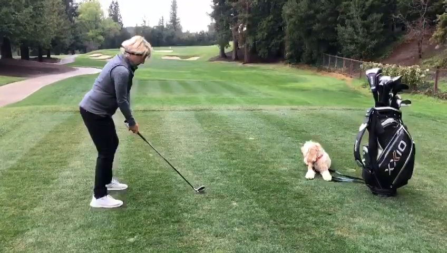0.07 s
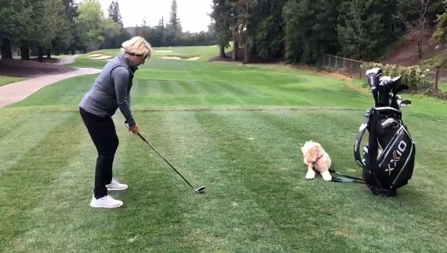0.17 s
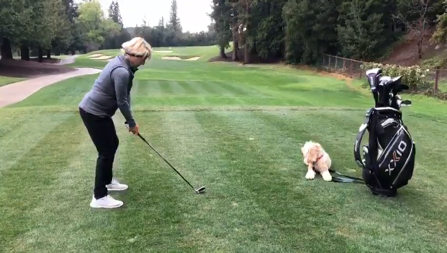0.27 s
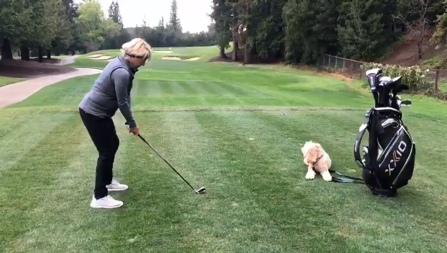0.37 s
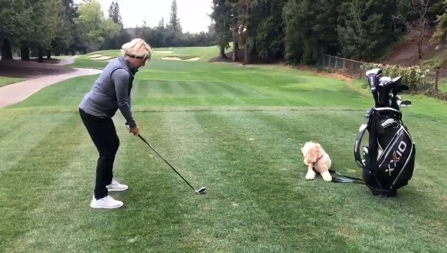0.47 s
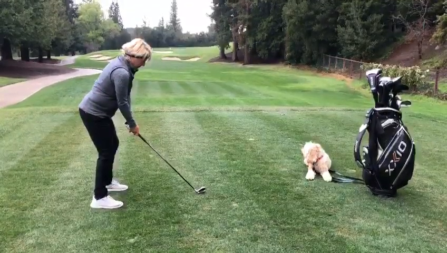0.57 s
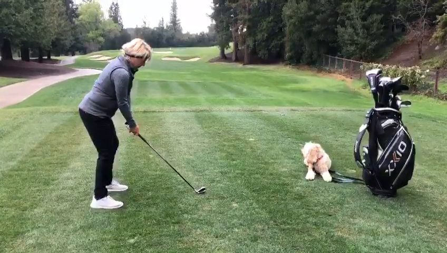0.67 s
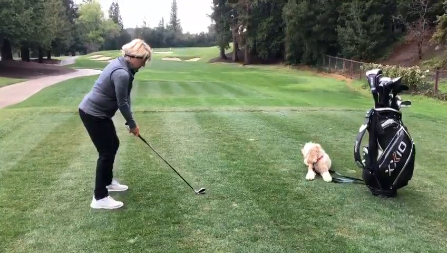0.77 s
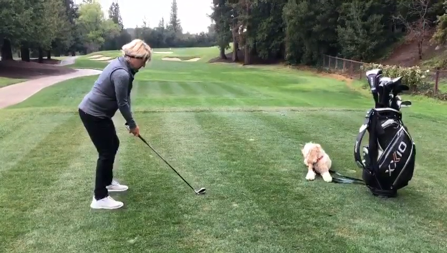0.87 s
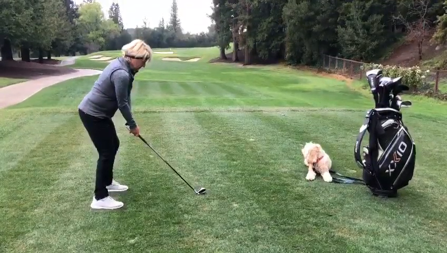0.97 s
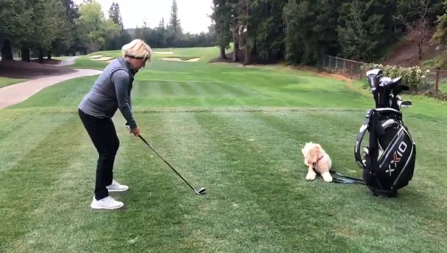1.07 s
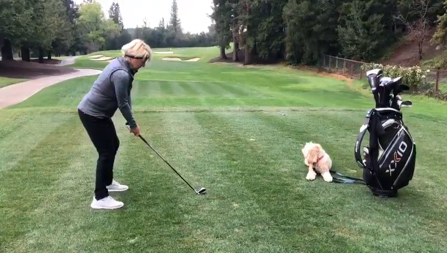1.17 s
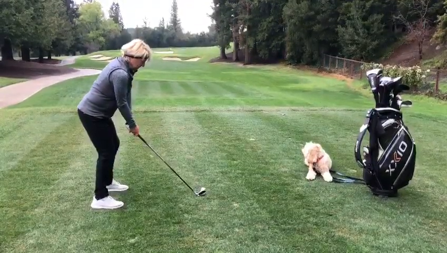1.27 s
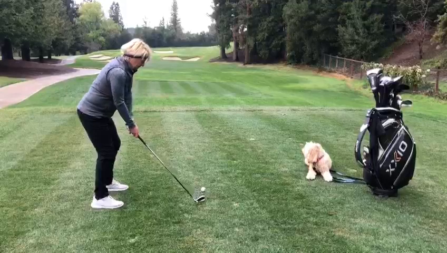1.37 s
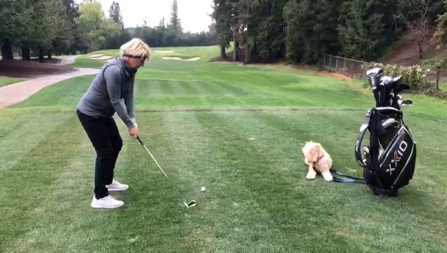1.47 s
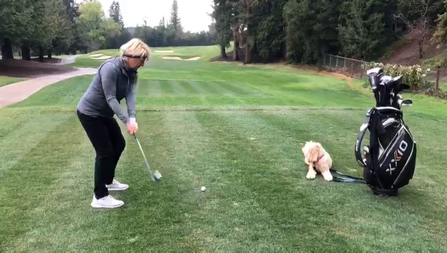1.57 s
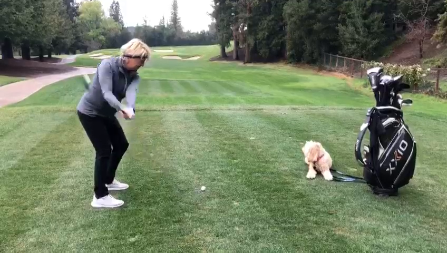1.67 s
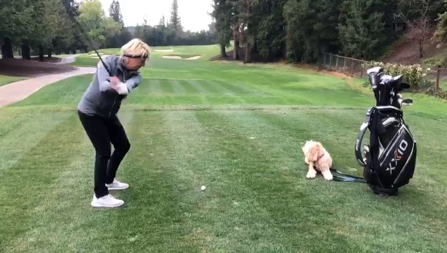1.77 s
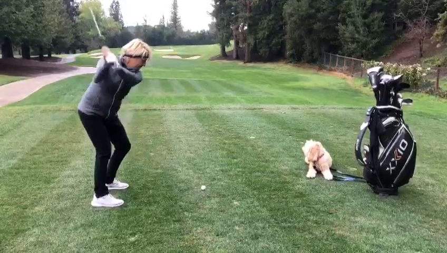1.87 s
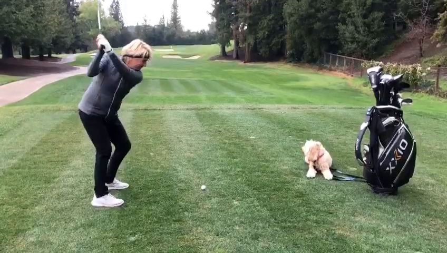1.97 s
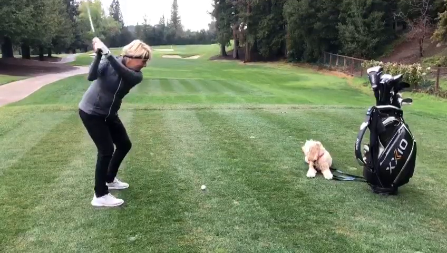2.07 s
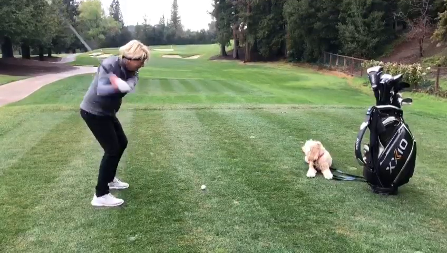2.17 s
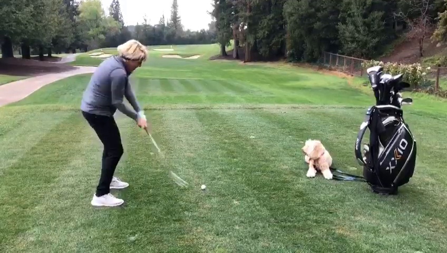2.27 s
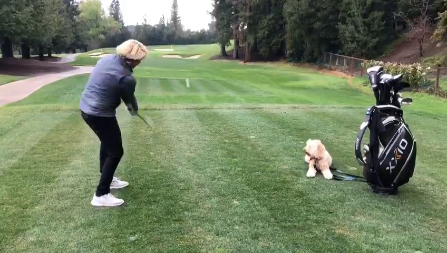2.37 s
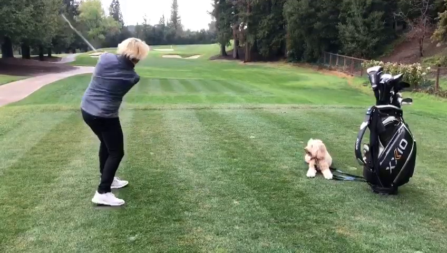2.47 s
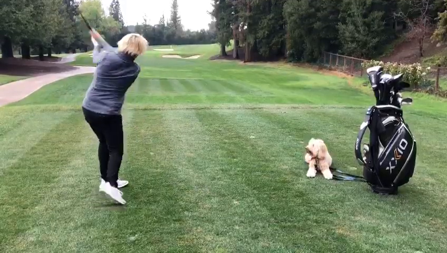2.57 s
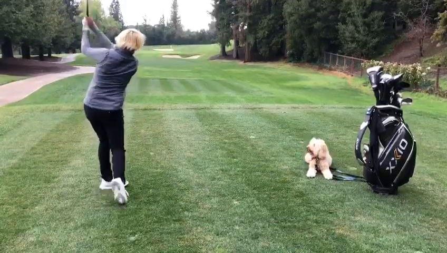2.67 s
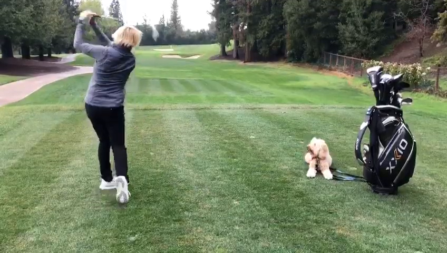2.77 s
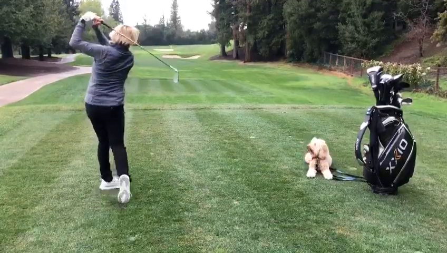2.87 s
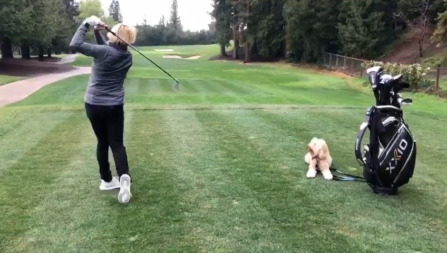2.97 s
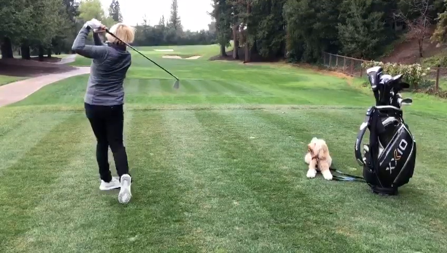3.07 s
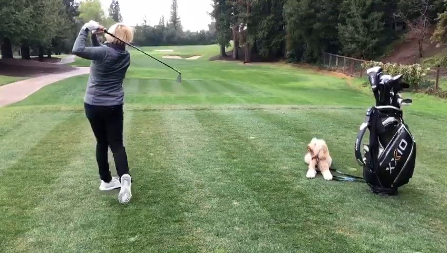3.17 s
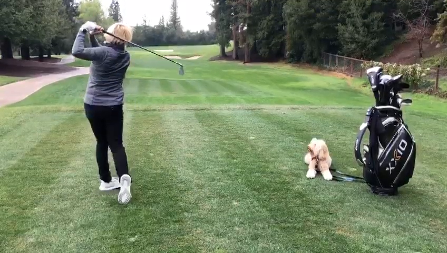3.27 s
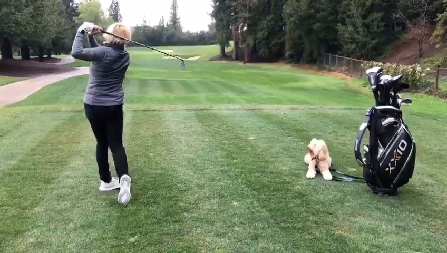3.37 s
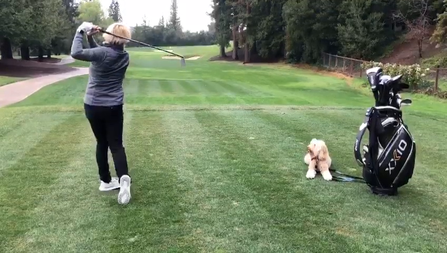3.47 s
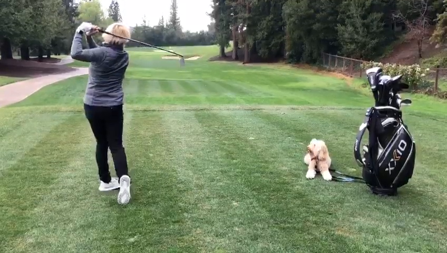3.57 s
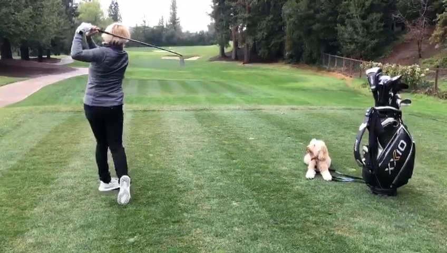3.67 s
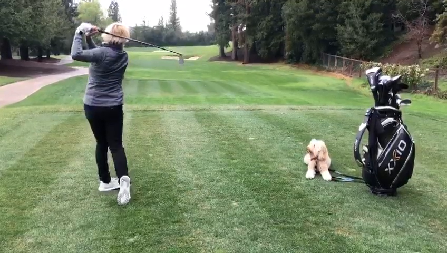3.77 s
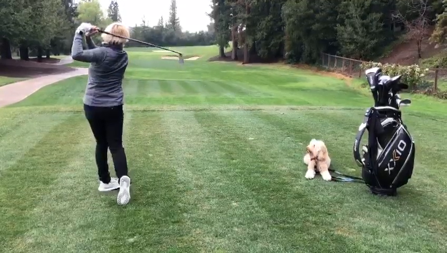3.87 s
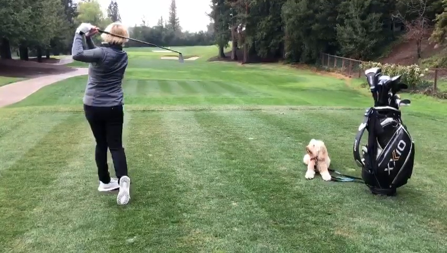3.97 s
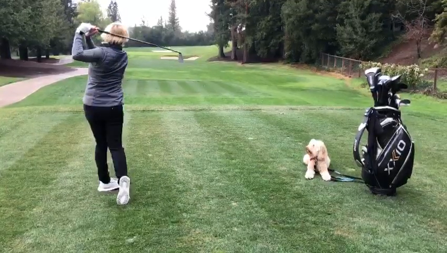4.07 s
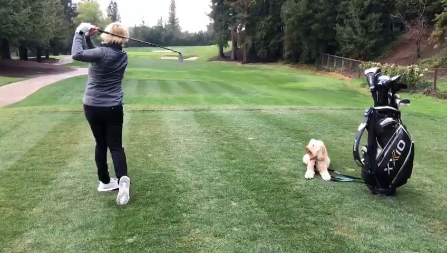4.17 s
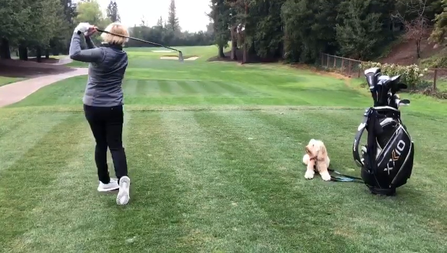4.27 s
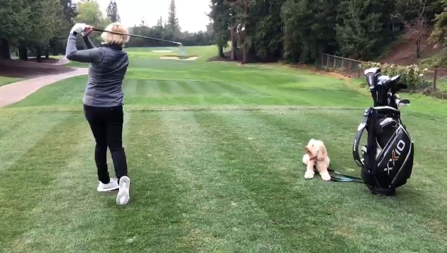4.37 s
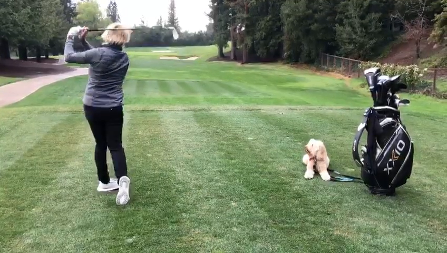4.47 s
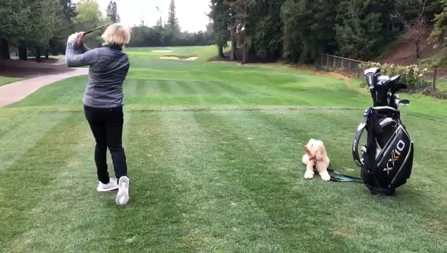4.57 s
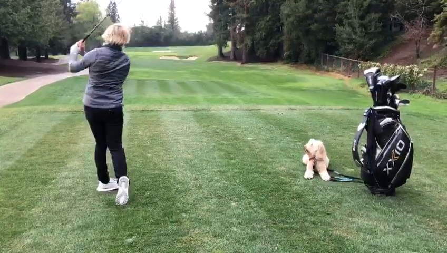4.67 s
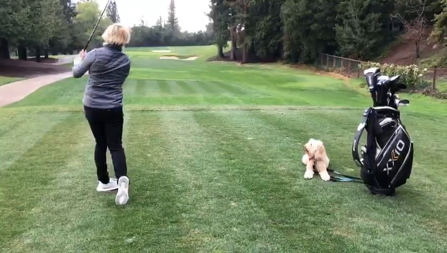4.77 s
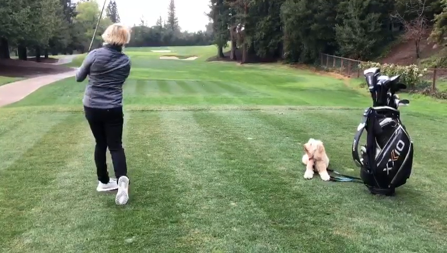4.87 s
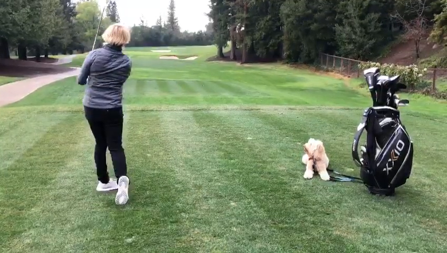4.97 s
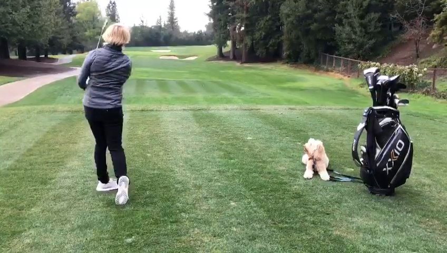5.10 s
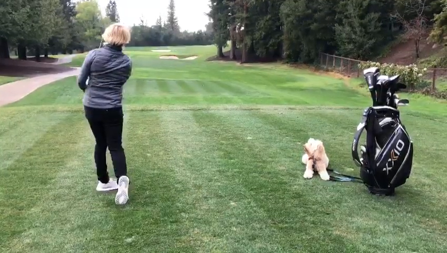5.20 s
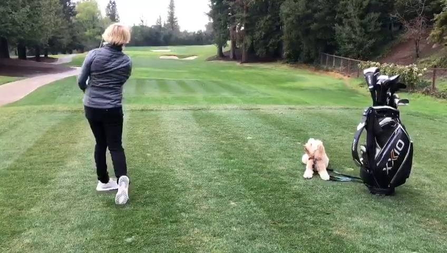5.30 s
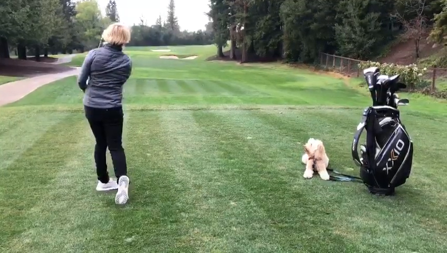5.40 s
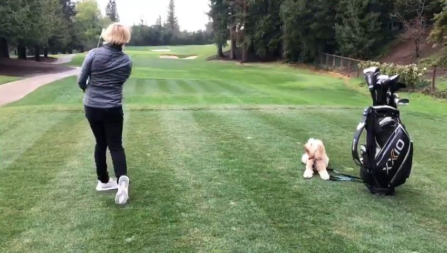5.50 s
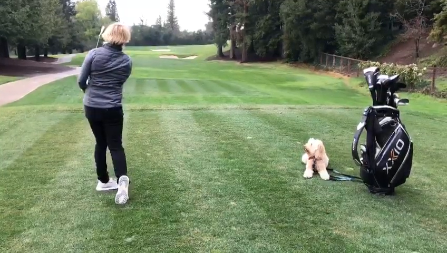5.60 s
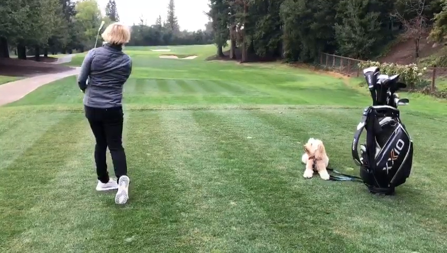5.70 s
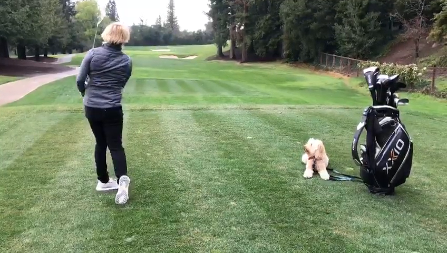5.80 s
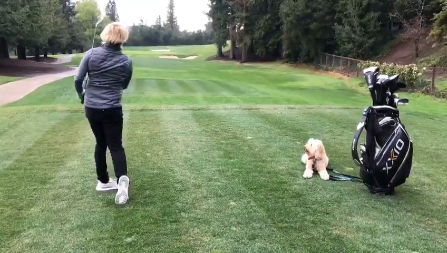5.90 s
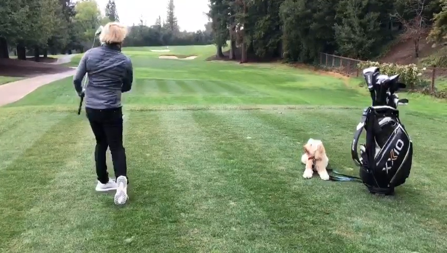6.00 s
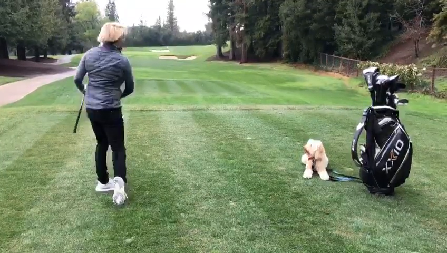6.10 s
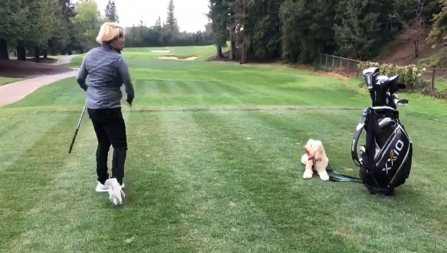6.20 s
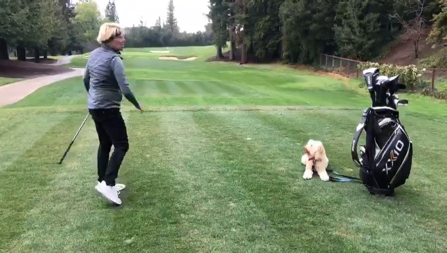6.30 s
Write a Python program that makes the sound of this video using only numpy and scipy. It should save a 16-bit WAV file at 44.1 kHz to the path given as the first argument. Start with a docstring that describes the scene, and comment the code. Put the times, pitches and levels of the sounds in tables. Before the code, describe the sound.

Quiet outdoor golf swing: faint birdsong and far road hum, brief clothing rustle, a quick whoosh, one loud crisp strike and a grainy woodland echo.

```python
"""On a mown tee by a tree line, an iron strikes a golf ball and the click comes back from the trees.
Dying sines make the blow and thud; shaped, fading noise makes the thrown-up grit and the grainy tail.
Before and long after it, bright noise grains rustle as clothes; gusty noise whooshes with the shaft's swing.
Behind it, coloured noise roars evenly as far traffic with a low engine hum, two small birds call in
gliding sines blurred by the wood, and a very faint steady sine sits high in the hiss."""
import sys
import numpy as np
from scipy import signal
from scipy.fft import rfft, irfft
from scipy.io import wavfile
from scipy.ndimage import uniform_filter1d

SR = 44100
rng = np.random.default_rng(int(sys.argv[2]) if len(sys.argv) > 2 else 0)


def natural_amplitude(level_db):
    """Convert a level in decibels to a linear amplitude factor, elementwise."""
    exponent = np.asarray(level_db, float) / 20
    return 10 ** exponent


def pcm_store(signal):
    """Save signal as 16-bit PCM."""
    levels = np.round(np.clip(np.atleast_2d(signal), -1, 1) * 32767)
    wavfile.write(sys.argv[1], SR, levels.astype(np.int16).T)


N = 279682

# Far traffic over time: (time [s], level shift [dB])
TRAFFIC_COURSE = [(0, 1.5), (.6, -0.1), (1.8, 1.3), (3.0, 0.5), (4.2, -0.2), (5.1, 0), (6.34, -2.5)]
# Spectrum of the open air before levelling: (frequency [Hz], relative density [dB per Hz])
AIR_SPECTRUM = [(15, -42.5), (25, -15), (54, -2.5), (82, -0.5), (104, -2), (225, -9), (349, -16), (750, -7),
                (1010, -9), (1370, -15), (2240, -28.5), (4860, -44), (8000, -52), (11600, -54.5),
                (12000, -70)]
BASS_DB, MIDDLE_DB, HUM_DB = -49, -49, -55.5
MIDDLE_FOLLOWS, HUM_FOLLOWS = .4, 2.1   # multiples of the traffic's level shift in dB
HUM_HZ, HUM_WIDTH_HZ = 80.3, 4.93
TONE_HZ, TONE_DB = 9950, -93.5

# First bird, a falling whistle and then a double tick: (time [s], whistle level [dB], tick level [dB])
WHISTLE_SONG = [(.295, -77, -75), (.455, -72.5, -74), (.612, -72.5, -76), (.772, -72.5, -73),
                (.937, -74, -75), (1.1, -78, -79), (1.262, -76, -76), (1.43, -76, -77), (3.87, -83, -90),
                (4.165, -76, -76), (4.33, -76, -76.5), (4.492, -74, -71.5), (4.655, -70.5, -71),
                (4.82, -74, -73), (4.995, -75, -73), (5.155, -74.5, -72.5)]
# Glide of one tick: (time [s], frequency [Hz], relative level [dB])
TICK_GLIDE = [(0, 6060, -8), (.004, 5300, -1), (.009, 5150, -4)]
WHISTLE_HZ, WHISTLE_DROP_HZ, WHISTLE_BEND, WHISTLE_S = 4650, 1500, 2.0, .07   # pitch falls ever faster
WHISTLE_HOLD_S, WHISTLE_FADE_DB_PER_S = .032, 520
TICK_AFTER_S, TICK_GAP_S = .089, 0.017   # from whistle start to first tick, then to the second
# Second bird, thin chips: (time [s], level [dB], pitch factor [1])
CHIP_CALLS = [(.012, -80, .88), (.035, -79, .88), (.095, -82, 1.0), (1.535, -79, 1.0), (3.963, -77, 1.0),
              (4.64, -81.5, 0.89), (4.68, -77, .75), (4.84, -85, 1.1), (5.038, -76.5, .96),
              (5.065, -80, .98), (5.67, -74.5, .97), (5.695, -75.5, .96)]
# Glide of one chip before its pitch factor: (time [s], frequency [Hz], relative level [dB])
CHIP_GLIDE = [(0, 6600, -1), (.004, 7580, -3), (.008, 6980, 3.5), (.012, 6600, 0)]
WOOD_T60_S, WOOD_DB = 0.74, -5          # ringing of the first bird among the trunks
THICKET_T60_S, THICKET_DB = .4, 3.0     # the second bird sits deeper among leaves

# Clothes and shoes moving:
# (top reached [s], time held [s], level [dB], rise [dB per s], fall [dB per s])
RUSTLE_MOVES = [(1.63, .17, -64.5, 140, 110), (1.88, .1, -73, 25, 35), (2.34, .03, -71, 50, 150),
                (2.398, .024, -52, 300, 600), (6.1, .055, -69, 150, 300), (6.2, 0.16, -79, 40, 30)]
# Spectrum of the cloth: (frequency [Hz], relative density [dB per Hz])
CLOTH_SPECTRUM = [(1500, -33), (2500, -1.5), (4000, -6.5), (6400, -9.5), (11000, -14.5), (11900, -17.5),
                  (12600, -46.5)]
# Creases snapping in the clothes: (time [s], level [dB])
CREASE_SNAPS = [(1.98, -72), (2.172, -64)]

# Head speed near the microphone: (time [s], share of top speed [1])
SWING_SPEED = [(2.3, .36), (2.345, .5), (2.374, .64), (2.387, 0.89), (2.41, 0.97), (2.425, .82),
               (2.436, .72)]
WHOOSH_DB, WHOOSH_HZ, WHOOSH_WIDTH_HZ = -42, 2200, 2200   # level and centre at top speed
WHOOSH_DB_PER_DECADE, PITCH_POWER = 61, .55               # how level and pitch follow speed

# Spectrum the trees return: (frequency [Hz], relative density [dB per Hz])
TREE_SPECTRUM = [(1500, -30), (2200, -8), (3300, -7), (4250, -1.5), (5050, -10), (6100, -3), (7000, -6),
                 (7800, -8.5), (9000, -11), (11500, -13), (12000, -34)]
# Stands of scatterers, nearest first (bag and turf, fence, front trunks, deep wood, far bank):
# (arrival [s], level at 5 kHz [dB], t60 [s], tilt [dB per octave])
SCATTERER_STANDS = [(2.448, -55, .35, 0.5), (2.483, -44.5, .11, 11.0), (2.493, -50.5, .8, 1.2),
                    (2.56, -65, 2.2, -2.5), (2.9, -68, 1.1, 8.0)]
STAND_DEPTH = 0.0702         # build-up time as a share of the delay
AIR_LOSS_DB_PER_S = 11       # air absorption at 8 kHz, growing with pitch squared
TILT_TOP_HZ = 7600           # the tilt levels off above this
# Single short noise-burst echoes, one close and two late:
# (time [s], level [dB], centre [Hz], width [Hz], length [s])
SINGLE_ECHOES = [(2.463, -48, 3597, 3595, .004), (2.71, -70, 9500, 4020, .012),
                 (3.101, -70.5, 4010, 3010, .004)]
PING_S, PING_WAVER_PER_S = 2.685, 300
# Short rising ping in the tail: (time from its start [s], frequency [Hz], level [dB])
PING_GLIDE = [(0, 2300, -59), (.005, 2500, -52), (.009, 2680, -52), (.015, 2880, -60)]
# A narrow band in the tail climbs as it fades
CLIMB_S, CLIMB_DB, CLIMB_FALL_DB_PER_S = 2.495, -55.5, 95
CLIMB_HZ, CLIMB_HZ_PER_S, CLIMB_WIDTH_HZ = 4100, 3200, 850

# Ringing of club head and ball: (frequency [Hz], relative level [dB], t60 [s])
HEAD_MODES = [(2100, -10, .005), (2816, -6.5, 0.0077), (3700, -1, 0.0029), (4688, -1.5, 0.0033),
              (5460, -4.5, 0.0036), (6600, -2.5, 0.0052), (7485, -6, 0.0039), (8870, -5.5, 0.0066),
              (9880, -11, .0055), (11500, -4.5, 0.0049), (12160, -16.5, 0.0033), (9000, -23, .024)]
# Ball and sole against the turf: (frequency [Hz], relative level [dB], t60 [s])
THUD_MODES = [(277, -28.5, 0.064), (585, -27, 0.028), (942, -23.5, .016), (1194, -16, 0.025),
              (1611, -8, .011)]
STRIKE_S, STRIKE_DB = 2.4359, -7
GROUND_LAG_S, GROUND_DB = 0.0005564, -0.5   # turf bounce, relative to the direct click
SPRAY_DB, SPRAY_T60_S = -24.5, 0.028        # turf and grit thrown up by the sole


def rms_one(x):
    """Scales a signal to rms 1."""
    return x / np.sqrt(np.mean(x ** 2) + 1e-20)


def in_time(rows, column):
    """One column of a curve at every sample."""
    rows = np.array(rows)
    return np.interp(np.arange(N) / SR, rows[:, 0], rows[:, column])


def level(rows, db):
    """Gain along a dB course, silent outside the time of the rows."""
    t = np.arange(N) / SR
    inside = 1. * (t >= rows[0][0]) * (t <= rows[-1][0])
    return natural_amplitude(db) * uniform_filter1d(inside, size=200)


def swell(s, held, db, rise_db_per_s, fall_db_per_s):
    """Gain that climbs to a top, holds and falls away, with rounded corners."""
    t = np.arange(N) / SR - s
    rise = 1 + natural_amplitude(np.minimum(-rise_db_per_s * t, 200))
    fall = 1 + natural_amplitude(np.minimum(fall_db_per_s * (t - held), 200))
    return natural_amplitude(db) / rise / fall


def drift(rate):
    """Random course joining normal draws of spread 1, rate of them per second."""
    knots = rng.standard_normal(int(N / SR * rate) + 2)
    return np.interp(np.arange(N) / SR * rate, np.arange(len(knots)), knots)


def band(x, low_hz, high_hz):
    """Band-pass filter."""
    return signal.sosfilt(signal.butter(3, [low_hz, high_hz], "band", fs=SR, output="sos"), x)


def coloured(x, spectrum):
    """Noise given a spectrum in dB per Hz."""
    hz, db = np.transpose(spectrum)
    grid = np.maximum(np.fft.rfftfreq(len(x), 1 / SR), 1)
    gain = natural_amplitude(np.interp(np.log(grid), np.log(hz), db))
    return irfft(rfft(x) * gain, len(x))


def narrow(width_hz, hz):
    """Noise of a given width round a centre that may move; rms 1."""
    slow = signal.lfilter(*signal.butter(2, width_hz / 2, fs=SR), rng.standard_normal((2, N)))
    phase = 2 * np.pi * np.cumsum(hz + np.zeros(N)) / SR
    return rms_one(slow[0] * np.cos(phase) + slow[1] * np.sin(phase))


def dying(t60):
    """Half a second of noise, falling at 60 dB per t60."""
    t = np.arange(SR // 2) / SR
    return rng.standard_normal(len(t)) * natural_amplitude(-60 * t / t60)


def note(shape, pitch):
    """A sine along a (time, frequency, level) glide, with soft ends."""
    s, hz, db = np.transpose(shape)
    t = np.arange(int(s[-1] * SR)) / SR
    ends = np.clip(np.minimum(t, t[::-1]) / 0.0016, 0, 1)
    phase = 2 * np.pi * pitch * np.cumsum(np.interp(t, s, hz)) / SR
    return np.sqrt(2) * ends * natural_amplitude(np.interp(t, s, db)) * np.sin(phase)


def ring(modes, t):
    """Dying sines, neighbours in opposite sense; contact builds up over a few samples."""
    waves = []
    for k, (hz, db, t60) in enumerate(modes):
        waves.append((-1) ** k * natural_amplitude(db - 60 * t / t60) * np.sin(2 * np.pi * hz * t))
    return sum(waves) * (1 - np.exp(-t / .00009))


def blur(x, t60, db):
    """The wood's scattered return of a call."""
    wood = dying(t60)
    return natural_amplitude(db) * signal.fftconvolve(x, wood / np.sqrt(np.sum(wood ** 2)))[:N]


def add(out, x, s):
    """Mixes x into out, starting at s seconds."""
    at = round(s * SR)
    out[at:at + len(x)] += x[:N - at]


def far_roar():
    """Distant tyres and engines; bass, middle and hum follow the traffic, under a faint steady tone."""
    air, shift_db = coloured(rng.standard_normal(N), AIR_SPECTRUM), in_time(TRAFFIC_COURSE, 1)
    low = signal.sosfiltfilt(signal.butter(2, 330, fs=SR, output="sos"), air)
    bass = rms_one(low) * natural_amplitude(BASS_DB + shift_db + 1.3 * drift(5.5))
    middle = rms_one(air - low) * natural_amplitude(MIDDLE_DB + MIDDLE_FOLLOWS * shift_db + .4 * drift(9.1))
    hum = narrow(HUM_WIDTH_HZ, HUM_HZ) * natural_amplitude(HUM_DB + HUM_FOLLOWS * shift_db)
    tone = natural_amplitude(TONE_DB) * np.sin(2 * np.pi * TONE_HZ * np.arange(N) / SR)
    return bass + middle + hum + np.sqrt(2) * tone


def birds():
    """Gliding sines for whistles, double ticks and chips, each trailing a blur from the wood."""
    first, second = np.zeros(N), np.zeros(N)
    t = np.linspace(0, WHISTLE_S, 30)
    whistle_hz = WHISTLE_HZ - WHISTLE_DROP_HZ * (t / WHISTLE_S) ** WHISTLE_BEND
    fade_db = -WHISTLE_FADE_DB_PER_S * np.maximum(t - WHISTLE_HOLD_S, 0)
    whistle = np.transpose([t, whistle_hz, fade_db])
    for s, whistle_db, tick_db in WHISTLE_SONG:
        pitch = 1 + .008 * rng.standard_normal()
        add(first, natural_amplitude(whistle_db) * note(whistle, pitch), s)
        add(first, natural_amplitude(tick_db) * note(TICK_GLIDE, 1), s + TICK_AFTER_S)
        add(first, natural_amplitude(tick_db) * note(TICK_GLIDE, 1.02), s + TICK_AFTER_S + TICK_GAP_S)
    for s, db, pitch in CHIP_CALLS:
        add(second, natural_amplitude(db) * note(CHIP_GLIDE, pitch), s)
    flutter = natural_amplitude(1.3 * drift(140))      # moving air and leaves make the direct calls waver
    direct = (first + second) * flutter
    return direct + blur(first, WOOD_T60_S, WOOD_DB) + blur(second, THICKET_T60_S, THICKET_DB)


def rustle():
    """Cloth sliding on cloth: dense, slightly clumped bright grains, and creases that snap."""
    grains = rng.standard_normal(N) * natural_amplitude(1.4 * drift(201.1) + 0.57 * drift(25))
    moves = sum(swell(*row) for row in RUSTLE_MOVES)
    out = rms_one(coloured(grains, CLOTH_SPECTRUM)) * moves
    for s, db in CREASE_SNAPS:
        add(out, natural_amplitude(db) * band(dying(.03), 5000, 10000), s)
    return out


def whoosh():
    """Vortices behind the shaft: gusty noise whose centre moves with club speed, over a lower rush."""
    speed = in_time(SWING_SPEED, 1)
    rush = rms_one(band(rng.standard_normal(N), 400, 1900))
    gusts = natural_amplitude(1.5 * drift(179.26))
    vortices = narrow(WHOOSH_WIDTH_HZ, WHOOSH_HZ * speed ** PITCH_POWER) * gusts
    gain = level(SWING_SPEED, WHOOSH_DB + WHOOSH_DB_PER_DECADE * np.log10(speed))
    return gain * (vortices + natural_amplitude(-2.5) * rush)


def scattered_tail(t):
    """Countless twigs and trunks return the click as a grainy tail; air takes the treble faster."""
    grains = rng.standard_normal(N) * natural_amplitude(2.0 * drift(260))
    tail, out = rms_one(coloured(grains, TREE_SPECTRUM)), np.zeros(N)
    edges_hz = np.geomspace(1700, 13000, 8)
    for low, high in zip(edges_hz, edges_hz[1:]):
        hz, power = np.sqrt(low * high), 0
        for s, db, t60, tilt in SCATTERER_STANDS:
            since = np.maximum(t - s, 0)
            build_up = 1 - np.exp(-since / (STAND_DEPTH * (s - STRIKE_S)))
            tilt_db = tilt * np.log2(min(hz, TILT_TOP_HZ) / 5000)
            power = power + (natural_amplitude(db + tilt_db - 60 * since / t60) * build_up) ** 2
        air = natural_amplitude(-AIR_LOSS_DB_PER_S * (hz / 8000) ** 2 * np.maximum(t - STRIKE_S, 0))
        out += band(tail, low, high) * np.sqrt(power) * air
    return out


def trees():
    """The click's return: scattered tail, single noise-burst echoes, a rising ping and a climbing band."""
    t = np.arange(N) / SR
    out = scattered_tail(t)
    for s, db, hz, width_hz, length in SINGLE_ECHOES:
        hump = np.exp(-((np.arange(800) / SR - length / 2) / length * 2) ** 2)
        burst = band(rng.standard_normal(800) * hump, hz - width_hz / 2, hz + width_hz / 2)
        add(out, natural_amplitude(db) * burst * np.sqrt(SR / 2 / width_hz), s)   # wide or narrow, equally strong
    waver = .7 + .6 * drift(PING_WAVER_PER_S)[:int(PING_GLIDE[-1][0] * SR)]
    add(out, note(PING_GLIDE, 1) * waver, PING_S)
    climb_hz = CLIMB_HZ + CLIMB_HZ_PER_S * np.clip(t - CLIMB_S, 0, .4)
    climb = narrow(CLIMB_WIDTH_HZ, climb_hz)
    return out + climb * swell(CLIMB_S, .03, CLIMB_DB, 1500, CLIMB_FALL_DB_PER_S)


def strike():
    """The blow rings the head; the turf returns the click half a millisecond on, thuds and sprays grit."""
    t, out = np.arange(SR // 10) / SR, np.zeros(N)
    click = ring(HEAD_MODES, t)
    bounce = natural_amplitude(GROUND_DB) * np.interp(t - GROUND_LAG_S, t, click, left=0)
    add(out, natural_amplitude(STRIKE_DB) * (click + bounce), STRIKE_S)
    add(out, natural_amplitude(STRIKE_DB) * ring(THUD_MODES, t), STRIKE_S + 0.00027)
    add(out, natural_amplitude(SPRAY_DB) * band(dying(SPRAY_T60_S), 950, 11800), STRIKE_S + 0.0011)
    return out


def scene():
    """All layers in one channel, from the background to the strike."""
    return (far_roar() + birds() + rustle() + whoosh() + trees() + strike())[None]


def band_limit(x):
    """A steep low-pass at the top of the band."""
    return signal.sosfilt(signal.butter(12, 13150, fs=SR, output="sos"), x)


def record(dry):
    """A small microphone with steep top and bottom cuts."""
    cut = signal.sosfilt(signal.cheby2(8, 45, 13300, fs=SR, output="sos"), dry)
    cut = signal.sosfilt(signal.butter(4, 42, "high", fs=SR, output="sos"), cut)
    return band_limit(cut)


dry = scene()
out = record(dry)
pcm_store(out)
```